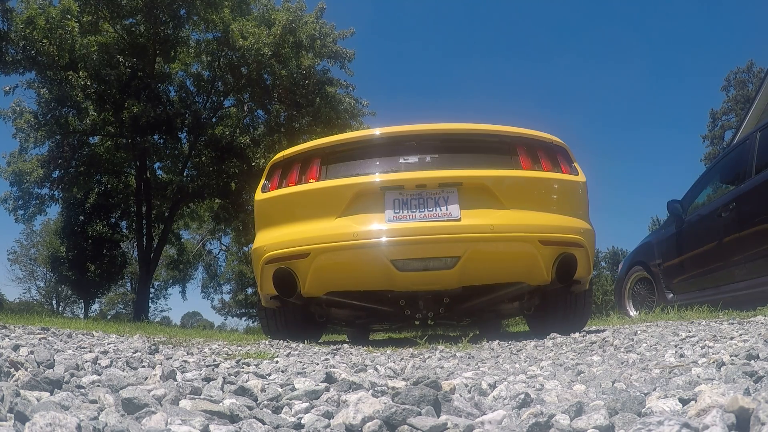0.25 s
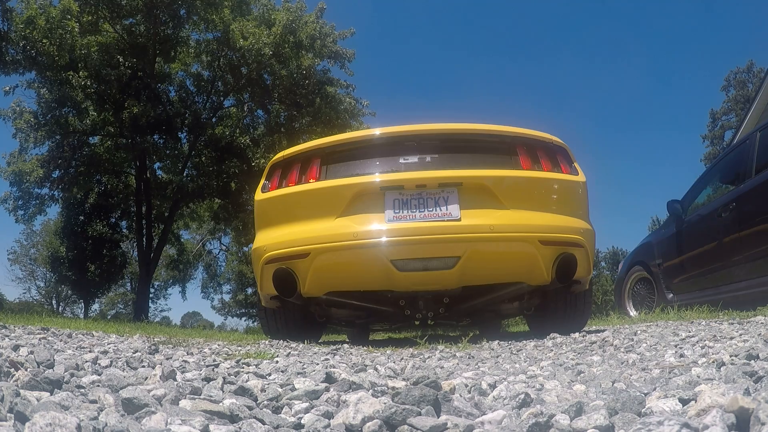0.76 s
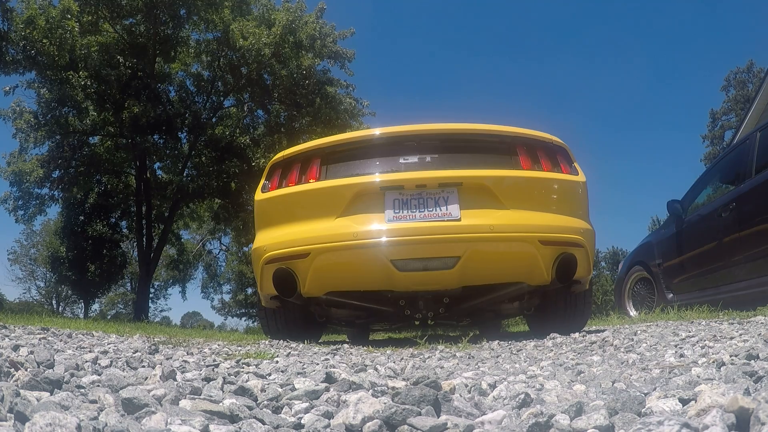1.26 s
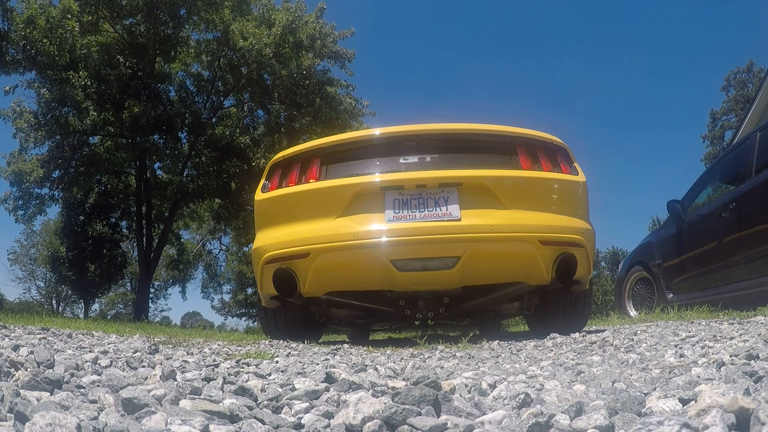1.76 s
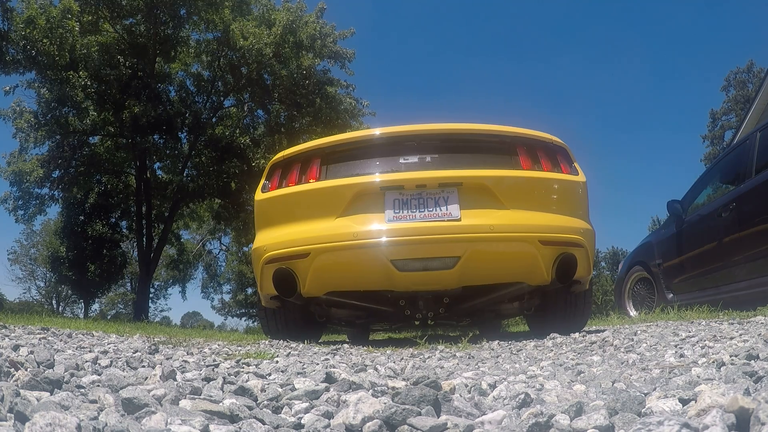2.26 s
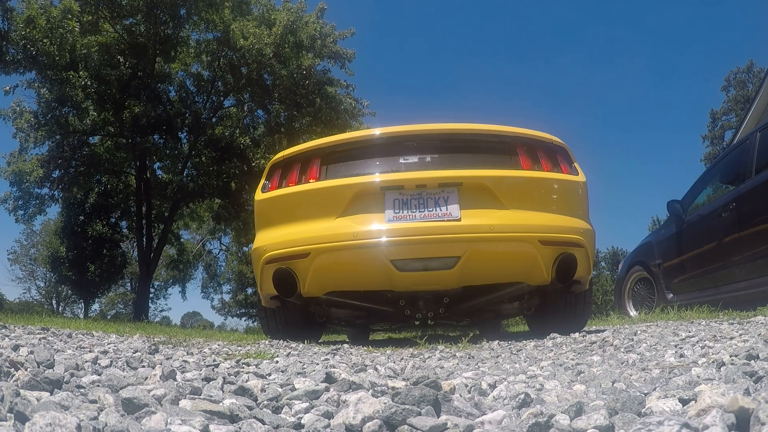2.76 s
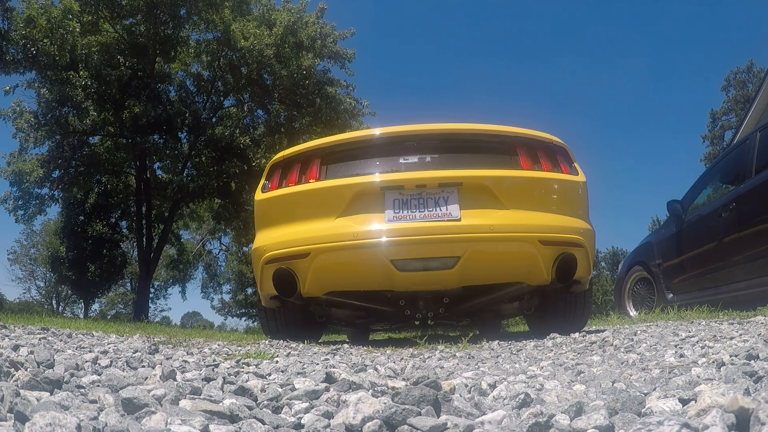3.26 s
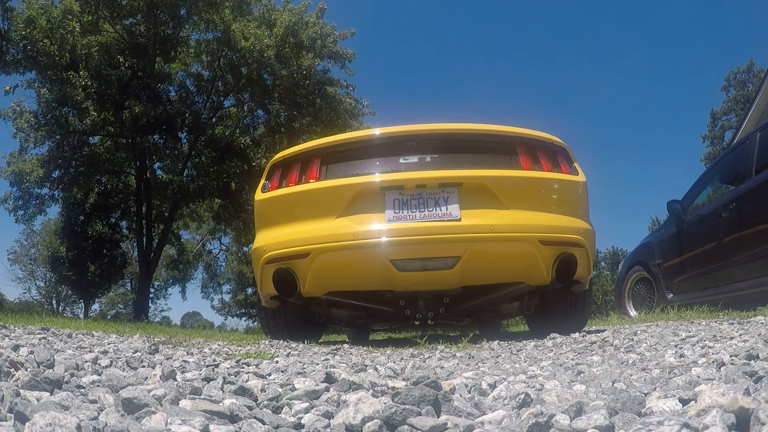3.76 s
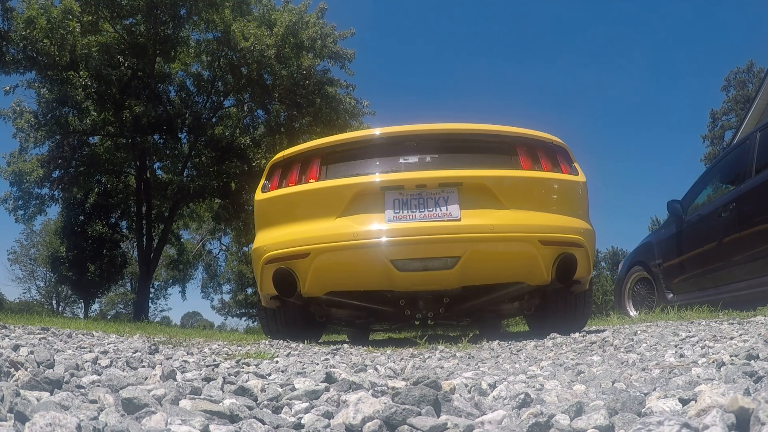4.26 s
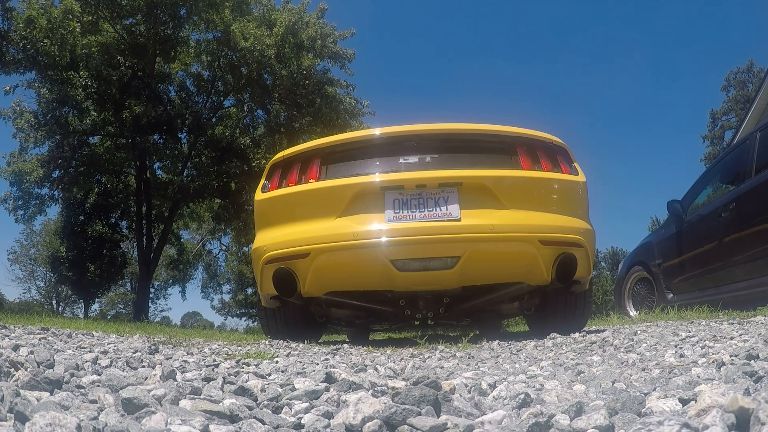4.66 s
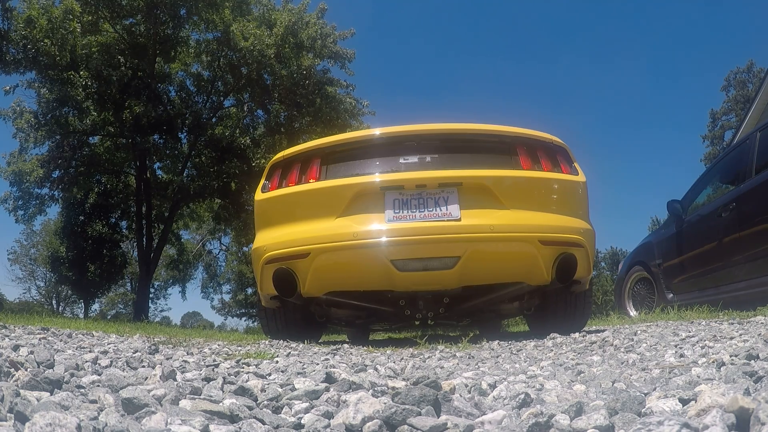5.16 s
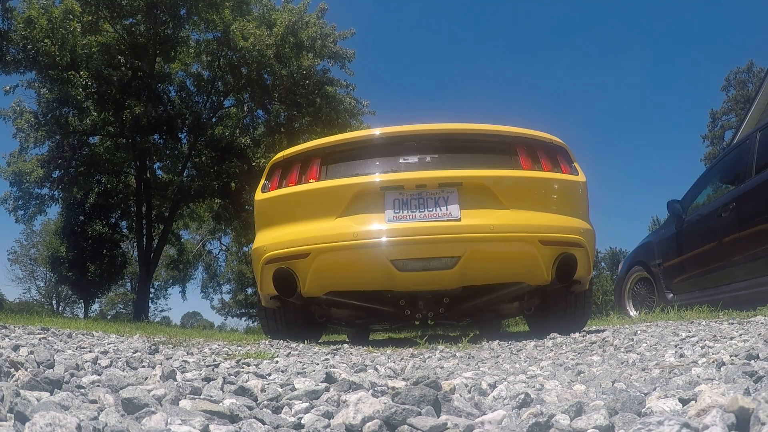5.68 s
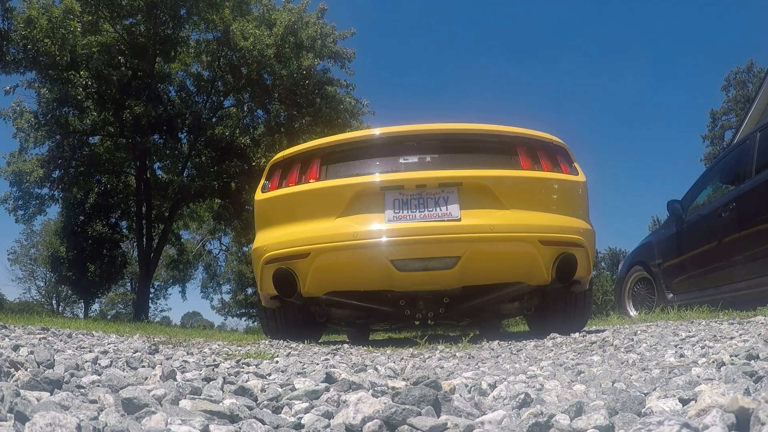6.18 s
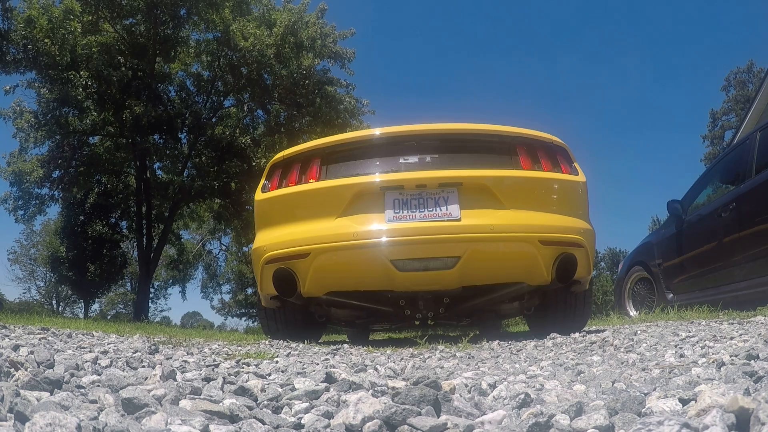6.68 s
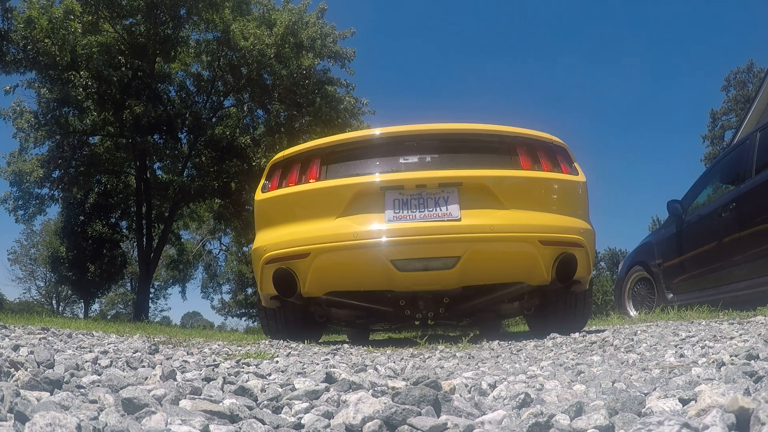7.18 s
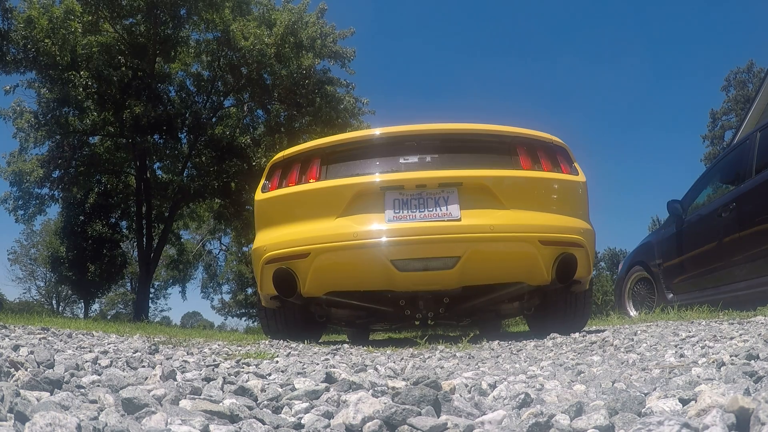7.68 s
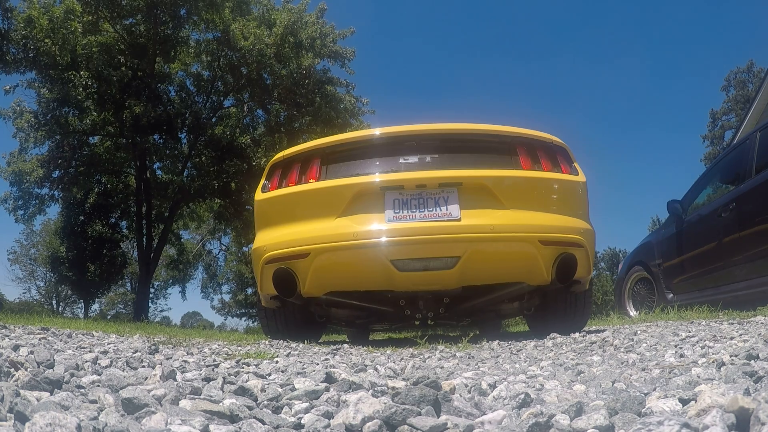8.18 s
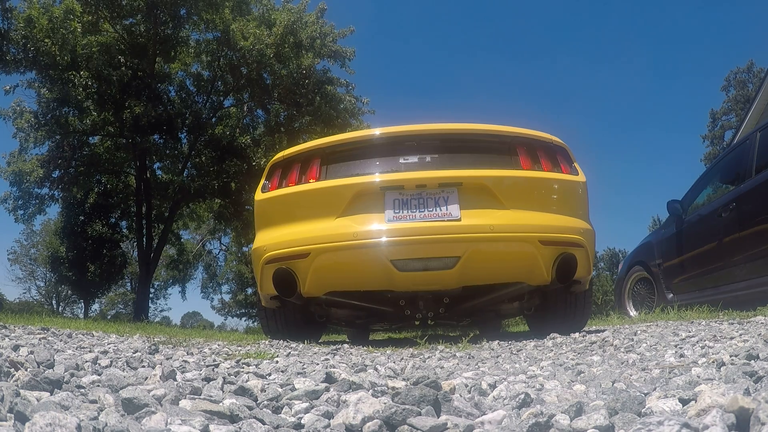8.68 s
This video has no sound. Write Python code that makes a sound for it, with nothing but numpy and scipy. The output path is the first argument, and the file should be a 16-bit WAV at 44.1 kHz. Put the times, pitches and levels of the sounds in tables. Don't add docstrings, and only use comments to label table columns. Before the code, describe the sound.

A loud eight-cylinder engine idles through open twin tailpipes, heard in stereo from low on a gravel lot just behind the car. It begins fast, bright and raspy with crackling pulses, then slows at about one and a half seconds into a deeper, fuller, uneven burble that holds steady. Faint soft puffs of air touch the microphone early on.

```python
import sys
import numpy as np
from scipy import signal
from scipy.fft import rfft, irfft, next_fast_len
from scipy.io import wavfile
from scipy.ndimage import uniform_filter1d

SR = 44100
rng = np.random.default_rng(int(sys.argv[2]) if len(sys.argv) > 2 else 0)


def rack_gain(trim_db):
    fader = np.asarray(trim_db, float)
    return 10 ** (fader / 20)


def digitize_waveform(pressure):
    field = np.atleast_2d(pressure).T
    bounded = np.clip(field, -1, 1)
    quanta = np.round(bounded * 32767).astype(np.int16)
    wavfile.write(sys.argv[1], SR, quanta)


N = 393813
SIZE = next_fast_len(N + SR)
HZ = np.fft.rfftfreq(SIZE, 1 / SR)
T = np.arange(N) / SR

# t/s, rate/(firings per s)
FIRING_RATE = [(0.0, 94.31), (0.66, 97.94), (0.87, 96.39), (1.41, 86.04), (1.62, 83.86), (2.67, 82.68),
               (2.94, 83.6), (4.14, 82.34), (4.38, 83.07), (5.01, 82.09), (5.64, 82.6), (6.57, 82.09),
               (6.72, 82.54), (7.29, 81.44), (7.86, 83.1), (8.31, 82.78), (8.61, 83.87), (8.93, 83.36)]
RATE = np.interp(T, *np.transpose(FIRING_RATE))
FIRING = np.cumsum(RATE) / SR + .365
SETTLED_SHARE = np.clip((94.0 - RATE) / (94.0 - 83.6), 0, 1)


def evened(x):
    return x / np.sqrt(np.mean(x ** 2))


def steadied(x, size=8500):
    return x / np.sqrt(uniform_filter1d(x ** 2, size, mode="reflect"))


def read(points):
    f, value = np.transpose(points)
    return np.interp(np.log(HZ + 1), np.log(f + 1), value)


def shaped(x, gain):
    return irfft(rfft(x, SIZE) * gain, SIZE)[..., :N]


def modes(rows):
    response = 0
    for f, width, strength in rows:
        damping = 1j * HZ * width
        response = response + strength * damping / (f ** 2 - HZ ** 2 + damping)
    return response


def blend(fast, settled, place):
    return fast + (settled - fast) * np.interp(place, FIRING, SETTLED_SHARE)


def lagged(lag_s):
    keep = np.exp(-1 / (lag_s * SR))
    return signal.lfilter([1 - keep], [1, -keep], SETTLED_SHARE)


def delayed(fast, settled, ms):
    fast_per_s, settled_per_s = 96.3, 82.6
    return fast + ms * fast_per_s / 1000, settled + ms * settled_per_s / 1000


def train(fast, settled, size_fast, size_settled, jitter_ms, spread_db, drift_db):
    cycle = 8 * np.arange(-1, FIRING[-1] // 8 + 1)[:, None]
    place = cycle + blend(fast, settled, cycle + fast)
    late, wobble, slow = rng.standard_normal(place.shape + (3,)).transpose(2, 0, 1)
    drift = evened(uniform_filter1d(slow, size=7, axis=0))
    steady = blend(.45, 1, place)
    size = blend(size_fast, size_settled, place) * rack_gain((spread_db * wobble + drift_db * drift) * steady)
    at = np.interp(place, FIRING, T, left=-1, right=-1) * SR + (late + drift) * jitter_ms * SR / 1000
    keep = (at >= 0) & (at < N - 1)
    whole, part = (at[keep] // 1).astype(int), at[keep] % 1
    early_half = np.bincount(whole, size[keep] * (1 - part), N)
    late_half = np.bincount(whole + 1, size[keep] * part, N)
    return early_half + late_half


def echoed(rows, echoes):
    pipe_of_cylinder = [1, 0, 1, 0, 0, 1, 0, 1]
    out = []
    for (fast, settled, push_fast, push_settled), pipe in zip(rows, pipe_of_cylinder):
        for ms, share_fast, share_settled in [(0, 1, 1), *echoes[pipe]]:
            places = delayed(fast, settled, ms)
            out.append((*places, push_fast * share_fast, push_settled * share_settled))
    return np.transpose(out)


def ports(a, b):
    # f/Hz, level difference/dB
    balance = [(60, 2.5), (150, 1.5), (340, 0), (600, -3), (900, -5.5), (1500, -1.5), (2600, -1.5),
               (4700, 0), (6300, 7.2), (7500, 5), (8500, -2), (9500, -8), (12000, -8), (15000, -6)]
    # f/Hz, phase/rad
    lead = [(60, 0.15), (250, 0.48), (600, 0), (1000, 1.11), (1500, 0.9), (1900, 1), (6000, -1.14),
            (7000, 1.5), (8600, 2), (10700, 2.3), (12500, 5)]
    # f/Hz, coherence/(0-1)
    likeness = [(60, 0.49), (500, 0.58), (1200, 1), (2500, 0.91), (4500, 0.91), (6500, 0.75), (9000, 0.62),
                (14000, 0.22)]
    same = np.clip(read(likeness), 0, 1)
    turn = rack_gain(read(balance) / 2) * np.exp(.5j * read(lead))
    near, apart = np.sqrt((1 + same) / 2), np.sqrt((1 - same) / 2)
    common = shaped(a, near * np.array([turn, 1 / turn]))
    return common + shaped(b, apart * np.array([turn, -1 / turn]))


def gusts():
    # t/s, level/dB
    puffs = [
        (.16, -31),
        (1., -37),
    ]
    level = rack_gain(-50) + sum(rack_gain(db) * np.exp(-((T - s) / 0.071) ** 2) for s, db in puffs)
    air = shaped(rng.standard_normal((N, 2)).T, 1 / (1 + (HZ / 36) ** 6))
    return level * evened(air + 1.3 * air[::-1])


def shake():
    shake_hz, fast_db, settled_db = 134, -30, -34
    band = 1 / (1 + (shake_hz / 2 / (HZ + 1)) ** 12) / (1 + (HZ / shake_hz) ** 4)
    return rack_gain(blend(fast_db, settled_db, FIRING)) * evened(shaped(rng.standard_normal(N), band))


def all_fronts():
    # place fast/firings, place settled/firings, level fast/dB, level settled/dB
    first_fronts = [(.35, .51, -20, -28), (1.46, 1.39, -11, -24), (2.37, 2.45, -13, -21),
                    (3.34, 3.43, -21, -21), (4.35, 4.31, -19, -30), (5.35, 5.38, -17, -19),
                    (6.39, 6.46, -10, -18.5), (7.3, 7.38, -30, -25)]
    # delay/ms, level fast/dB, level settled/dB
    twin_fronts = [(1.5, -12, -66), (1.298, -41, -22), (1.7, -55, -22), (2.9, -32, -35), (2.1, -10, -19.5),
                   (1.8, -10.5, -20), (2.2, -20, -19.5), (1.064, -7.5, -18.5)]
    fast, settled, fast_db, settled_db = np.transpose(first_fronts)
    ms, twin_fast_db, twin_settled_db = np.transpose(twin_fronts)
    first = [fast, settled, fast_db, settled_db]
    twin = [*delayed(fast, settled, ms), twin_fast_db, twin_settled_db]
    thrown_back = [*delayed(fast, settled, 5.0), fast_db - 8, settled_db - 7]
    return np.hstack([first, twin, thrown_back])


def gas_roar(fronts, crack, rush):
    # f/Hz, level/dB
    roar_colour = [(60, -20), (120, -9), (300, 4), (500, -1.5), (650, -7.5), (780, 4), (950, -6.5),
                   (1350, -9), (1600, -20.5), (2000, -45)]
    # f/Hz, width/Hz, strength
    rasp_mode = [(1126, 200, 1)]
    flow = evened(rush) + rack_gain(-6) * evened(crack) + rack_gain(-6.5)
    roar = shaped(flow * rng.standard_normal((N, 2)).T, rack_gain(read(roar_colour)))
    rasp = evened(shaped(fronts, modes(rasp_mode)))
    roar[0] -= blend(rack_gain(-14), rack_gain(-29), FIRING) * roar.std() * rasp
    return steadied(roar)


def gas_hiss(fronts, crack, rush):
    # f/Hz, level/dB
    crack_colour = [(1120, -59), (1900, -18), (2630, -7), (3450, -2.5), (3970, -3.5), (4380, -8),
                    (5040, -12.5), (6330, -7.5), (8160, -16), (9310, -17.5), (11300, -31), (13100, -36),
                    (13800, -37), (15500, -53)]
    flow = rack_gain(-6.5) * evened(crack) + rack_gain(-5.5) * evened(rush) + rack_gain(-12)
    gas = flow * rng.standard_normal((N, 2)).T
    gas[0] -= evened(fronts)
    hiss = shaped(gas, rack_gain(read(crack_colour)))
    sizzle = blend(rack_gain(11.5), rack_gain(-45), FIRING) * shaped(hiss, HZ ** 2 / (HZ ** 2 + 7000 ** 2))
    return steadied(hiss + sizzle)


def jets():
    fast, settled, fast_db, settled_db = all_fronts()
    fronts = train(fast, settled, rack_gain(fast_db), rack_gain(settled_db), 0.061, 2.66, 2.2)
    t = np.arange(1200) / SR
    rise = 1 - np.exp(-t / 0.00025)
    crack = signal.oaconvolve(fronts, rise * np.exp(-t / 0.00068))[:N]
    rush = signal.oaconvolve(np.sqrt(fronts), rise * np.exp(-t / 0.003))[:N]
    return gas_hiss(fronts, crack, rush), gas_roar(fronts, crack, rush)


def firing_drone():
    def tone(db, order, turns):
        return rack_gain(db) * np.cos(2 * np.pi * (order * FIRING - turns))

    beat = tone(-19.3, 1, .395)
    lope = tone(-31, 7 / 8, .135)
    throb = tone(-34, 10 / 8, .9)
    hum = tone(-31.5, 1, .17) + tone(-32.5, 11 / 8, .39)
    return 0.95 * lagged(0.2) * (beat + lope) + throb + (1 - SETTLED_SHARE) * hum


def tip_snaps():
    snap_cycle = [(0.346, 0.43, 0.022, 0.023), (1.309, 1.376, 0.01, 0.047), (2.273, 2.426, 0.049, 0.091),
                  (3.313, 3.447, 0.019, 0.041), (4.398, 4.338, 0.092, 0.01), (5.41, 5.42, 0.073, 0.049),
                  (6.388, 6.455, 0.031, 0.028), (7.387, 7.466, 0.056, 0.087)]
    # delay/ms, share fast, share
    snap_returns = [
        [(-1.46, 0.05, -0.38), (3.36, -0.4, -0.77), (6.06, 0.07, -0.94), (9.05, -0.99, -0.79)],
        [(-1.87, -0.21, 0.74), (1.74, -0.08, 0.46), (2.94, -0.42, -0.61), (7.54, 0.27, -0.32)],
    ]
    # f/Hz, width/Hz, signed strength
    tip_modes = [(329.0, 811.0, -1.21), (902.0, 108.0, 0.46), (1105.0, 470.0, 0.35)]
    return shaped(train(*echoed(snap_cycle, snap_returns), 0.04, 1.5, 2.4), modes(tip_modes))


def pipe_blows():
    blow_cycle = [(0.117, 0.304, 0.551, 0.732), (1.201, 1.306, 0.509, 0.641), (2.107, 2.297, 0.197, 0.191),
                  (3.102, 3.204, 0.285, 0.714), (4.126, 4.282, 0.285, 0.929), (5.084, 5.238, 0.395, 0.474),
                  (6.155, 6.265, 0.492, 0.668), (7.166, 7.272, 0.509, 0.701)]
    # delay/ms, share fast, share settled
    blow_returns = [
        [(-2.56, 0.05, 0.1), (6.69, 0.13, -0.11), (7.59, -0.3, -0.1), (11.0, -0.14, 0.58)],
        [(-3.67, -0.23, -0.05), (2.23, 0.24, 0.31), (6.61, 0.3, 0.26), (12.63, -0.09, -0.61)],
    ]
    # f/Hz, width/Hz, signed strength
    pipe_modes = [(122.0, 284.0, 0.45), (178.0, 231.0, -3.38), (229.0, 167.0, 6.94), (321.0, 201.0, -9.65),
                  (355.0, 232.0, 6.4), (684.0, 341.0, -0.3), (885.0, 282.0, 0.16)]
    return shaped(train(*echoed(blow_cycle, blow_returns), 0.029, 0.083, 0.073), modes(pipe_modes))


def thump():
    low_cut = signal.butter(6, 64, "high", fs=SR, output="sos")
    pulses = signal.sosfilt(low_cut, pipe_blows() + rack_gain(1.5) * tip_snaps()) * SR / 1000
    pulses = shaped(pulses, 1 / (1 + (HZ / 1450) ** 12))
    return steadied(pulses + firing_drone())


def levels():
    thump_fast_db, thump_settled_db, thump_lag_s = -16, -11, 0.63
    crack_fast_db, crack_settled_db, crack_sag_db_per_s = -28.5, -32.5, -0.41
    stumble = np.exp(-((T - 1.44) / 0.02) ** 2)
    thump_db = thump_fast_db + (thump_settled_db - thump_fast_db) * lagged(thump_lag_s) - 3 * stumble
    crack_db = blend(crack_fast_db, crack_settled_db, FIRING) + crack_sag_db_per_s * T - 7 * stumble
    return rack_gain(thump_db), rack_gain(crack_db)


def scene():
    low, high = levels()
    hiss, roar = jets()
    noisy = high * rack_gain(3.0) * hiss + low * blend(rack_gain(-9), rack_gain(-13), FIRING) * roar
    engine = low * rack_gain(1.05) * thump() + shake() + noisy[0]
    return ports(engine, noisy[1]) + gusts()


def roll_off(x):
    return signal.sosfilt(signal.butter(12, 15690, fs=SR, output="sos"), x)


def record(dry):
    edges = HZ ** 2 / (HZ ** 2 + 12 ** 2) / (1 + (HZ / 14300) ** 20)
    limited = 1.09 * np.tanh(dry / 1.038)
    return roll_off(shaped(limited, edges))


dry = scene()
out = record(dry)
digitize_waveform(out)
```